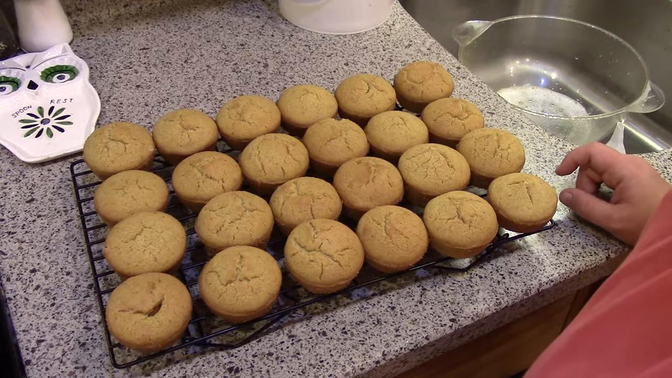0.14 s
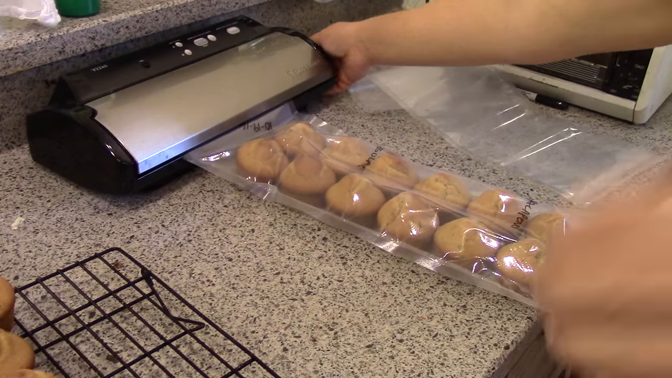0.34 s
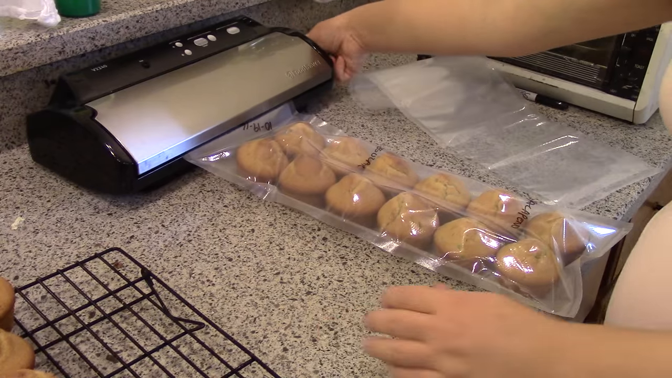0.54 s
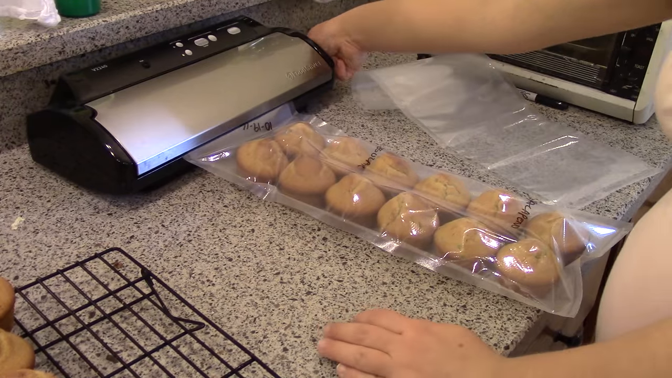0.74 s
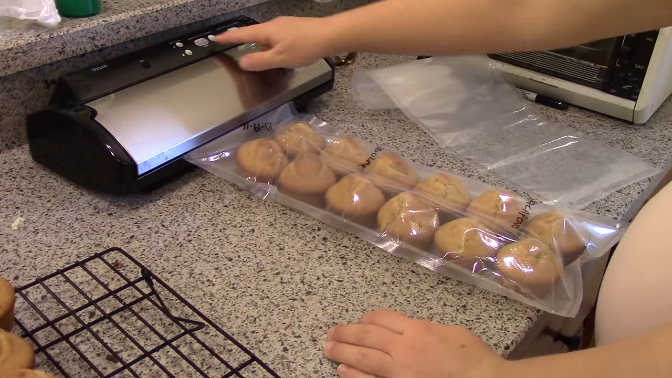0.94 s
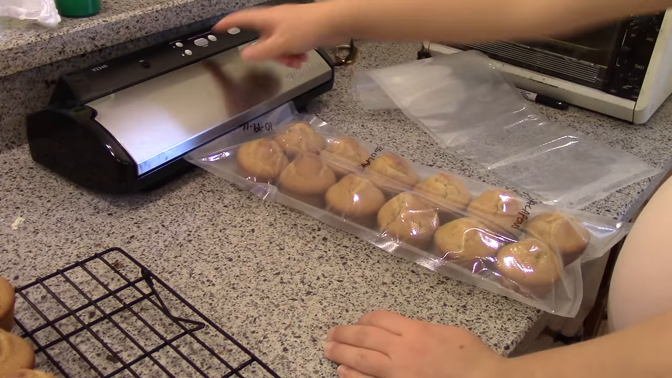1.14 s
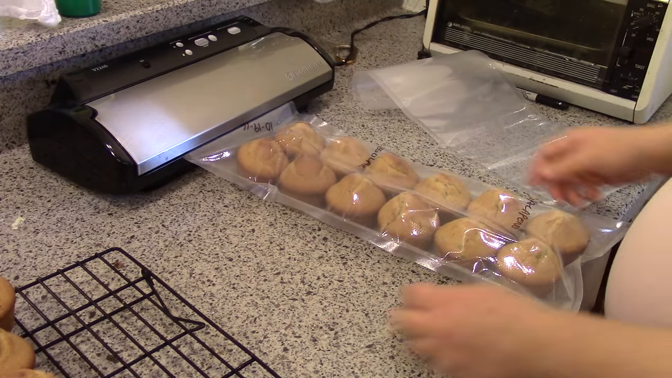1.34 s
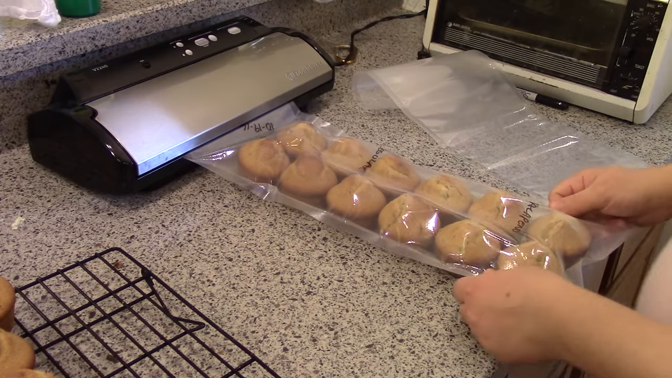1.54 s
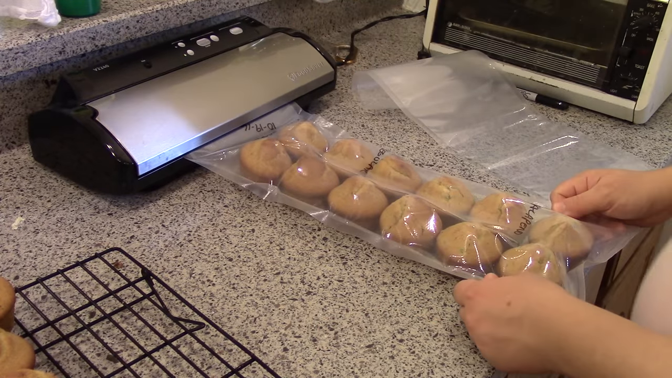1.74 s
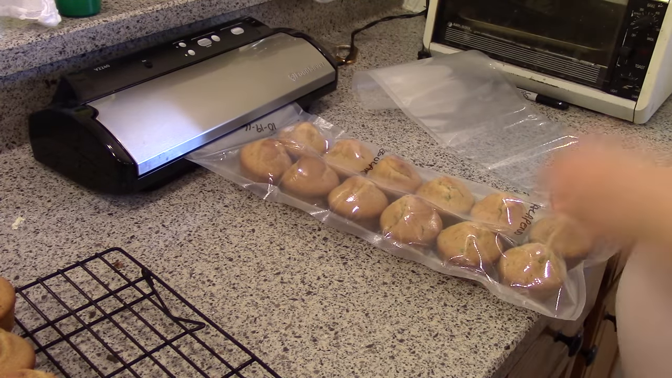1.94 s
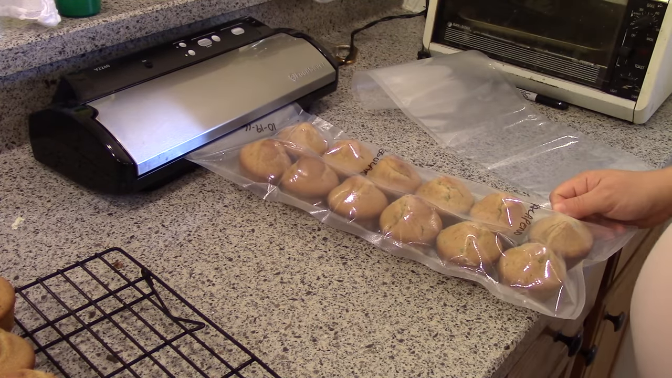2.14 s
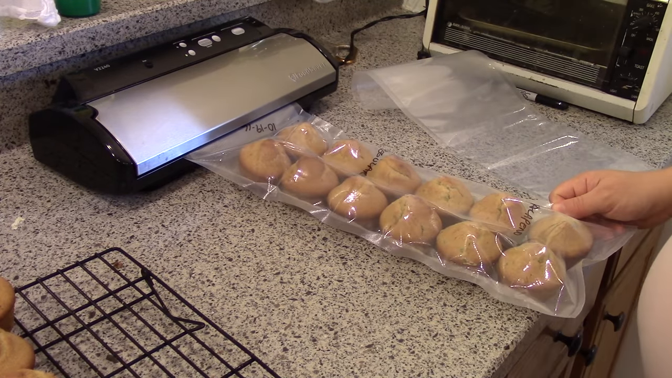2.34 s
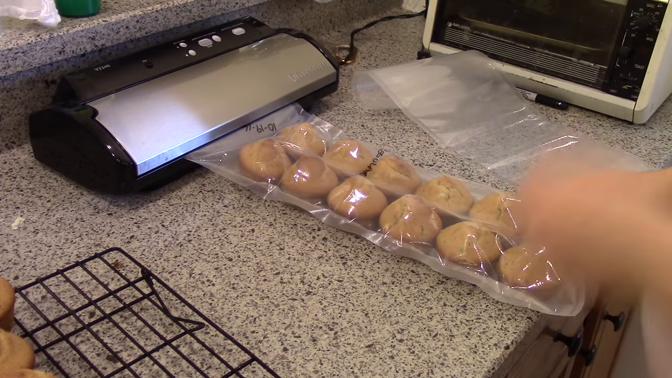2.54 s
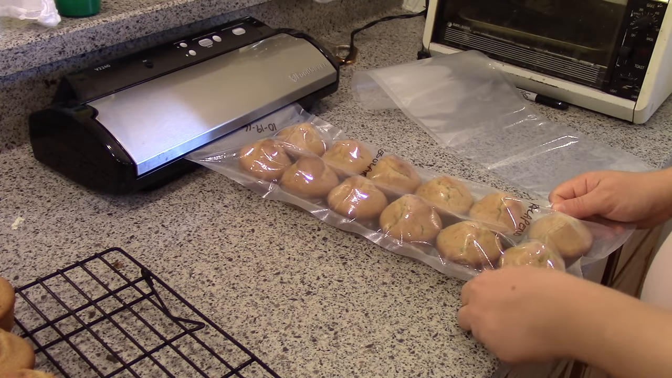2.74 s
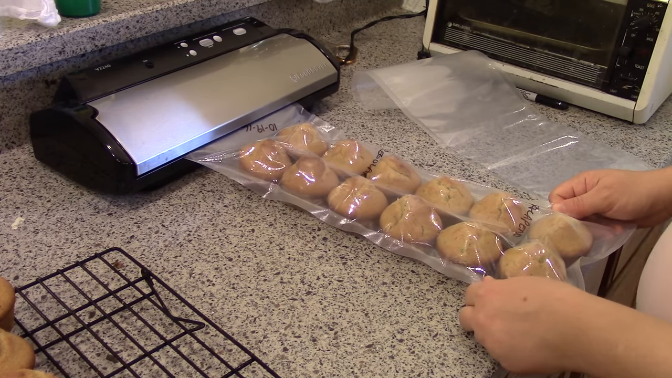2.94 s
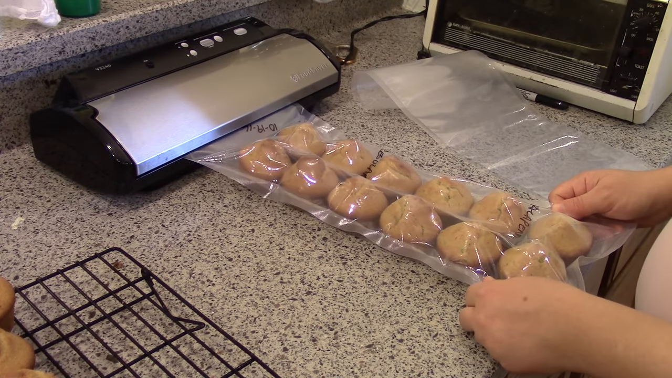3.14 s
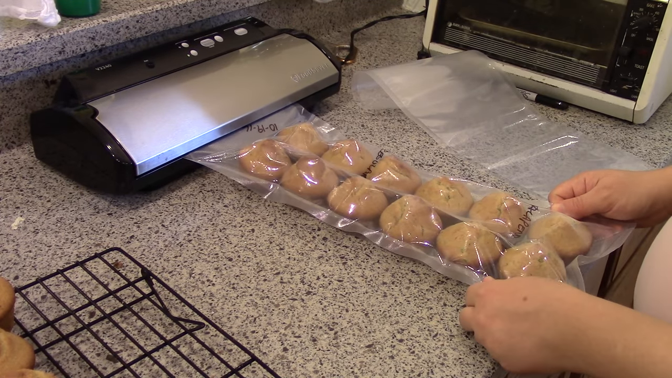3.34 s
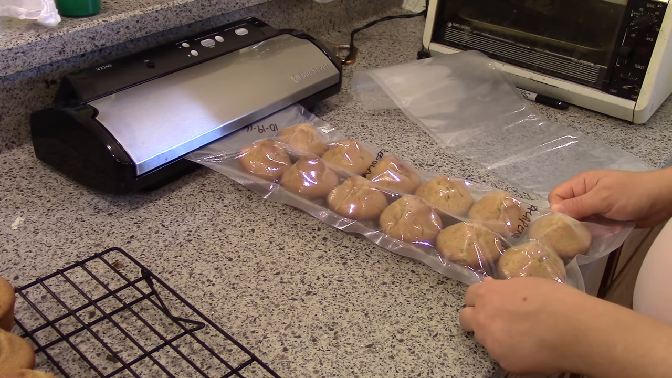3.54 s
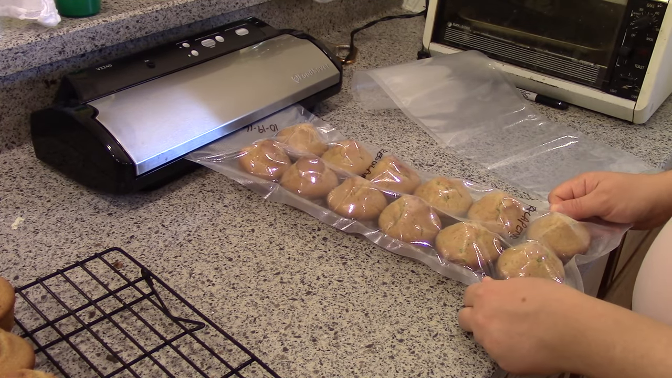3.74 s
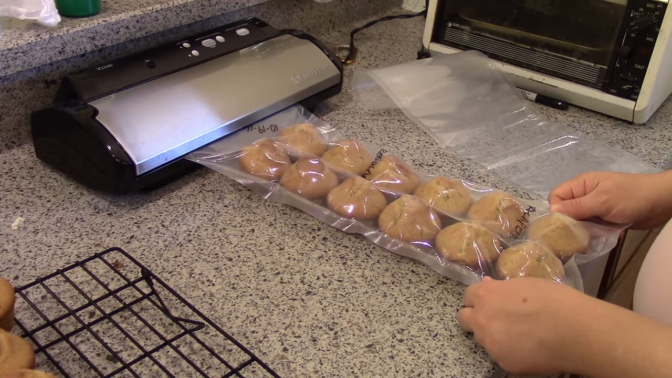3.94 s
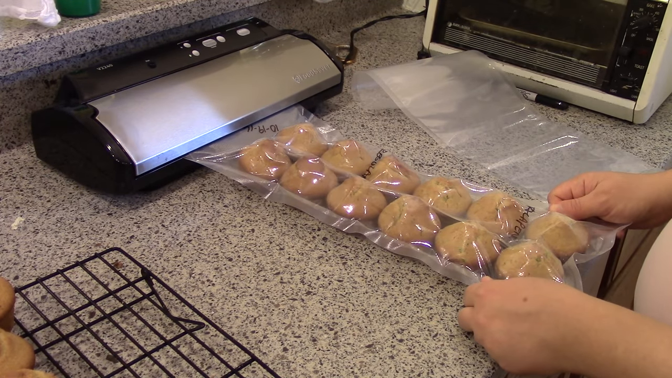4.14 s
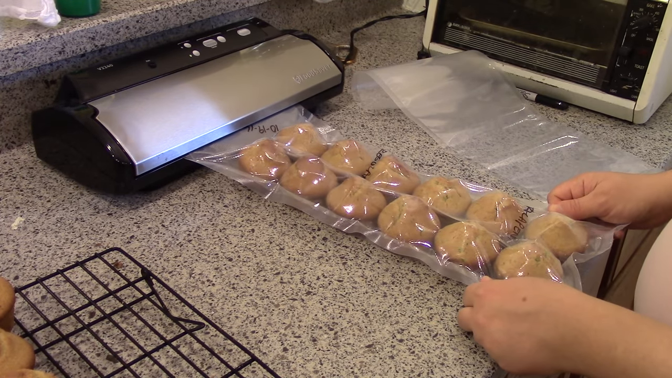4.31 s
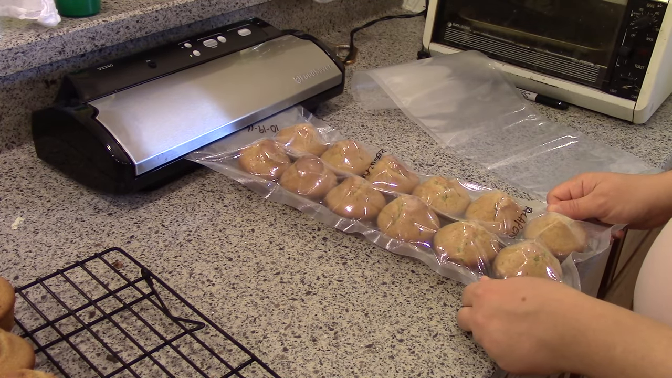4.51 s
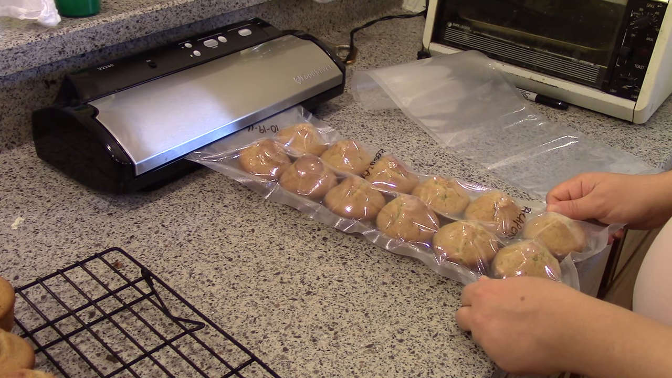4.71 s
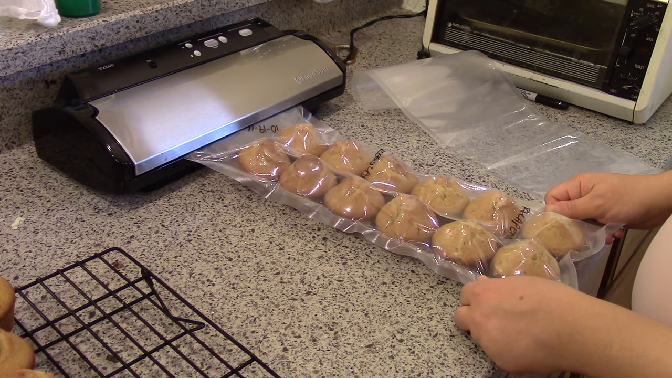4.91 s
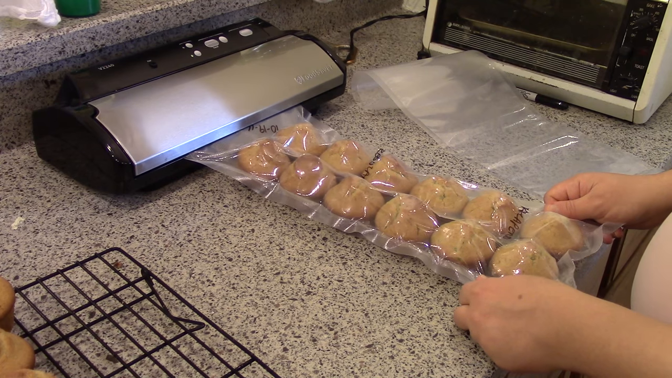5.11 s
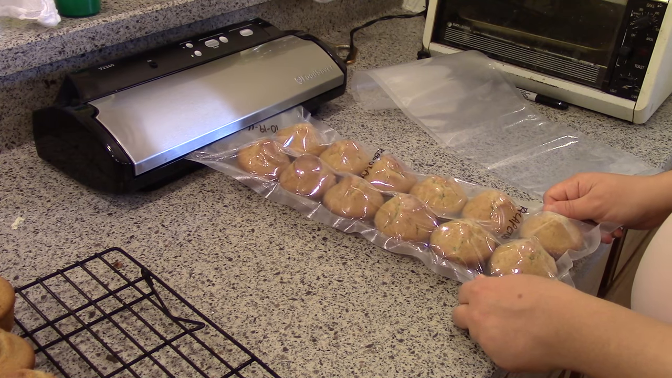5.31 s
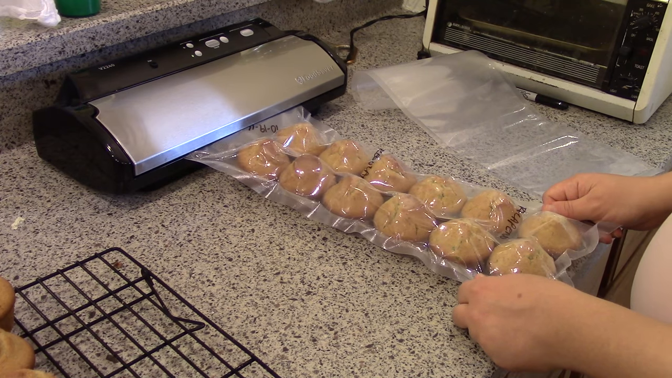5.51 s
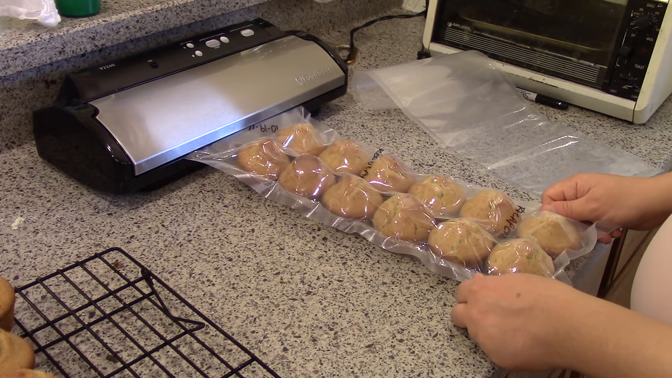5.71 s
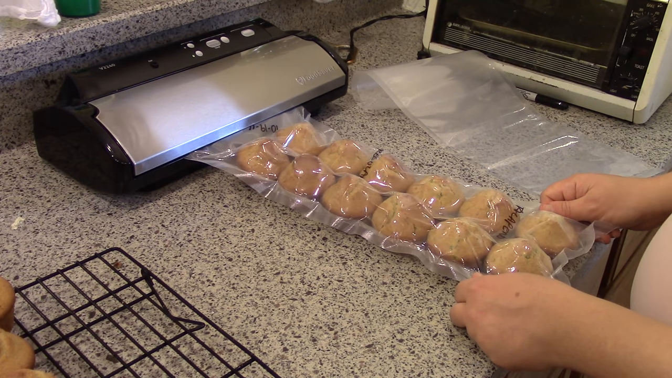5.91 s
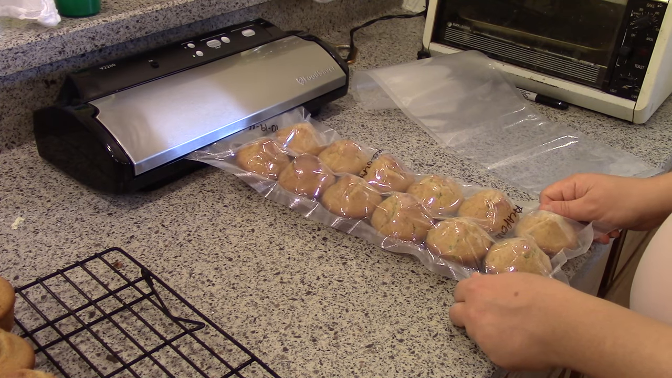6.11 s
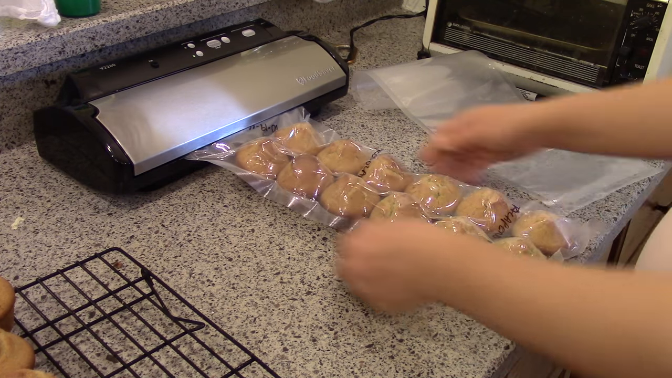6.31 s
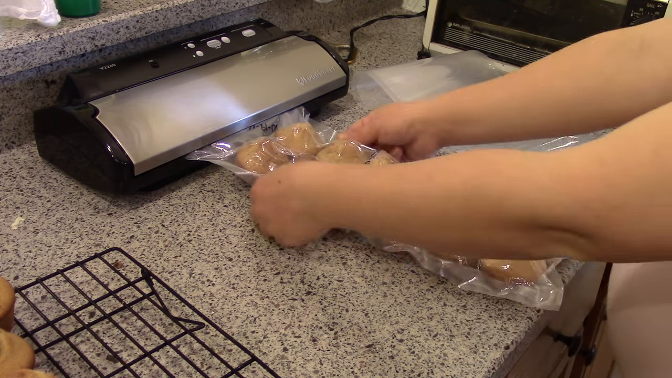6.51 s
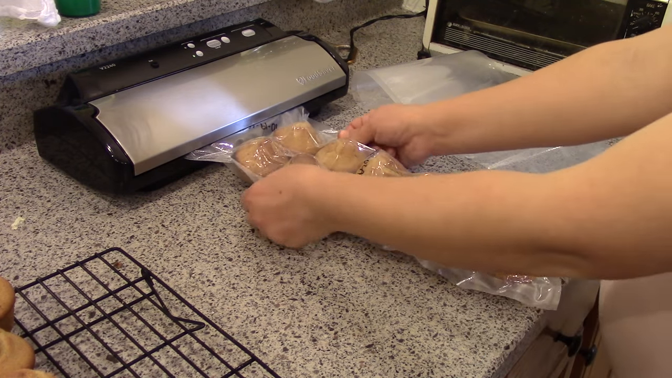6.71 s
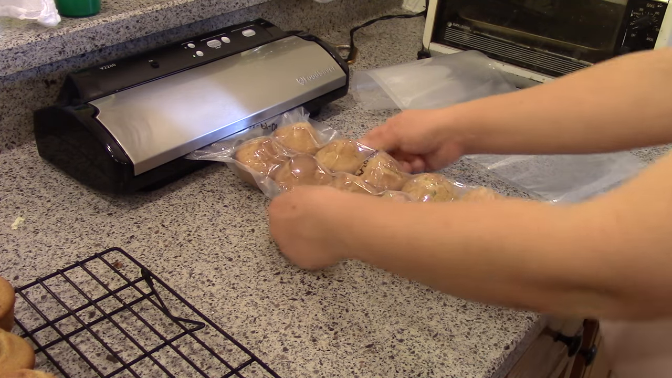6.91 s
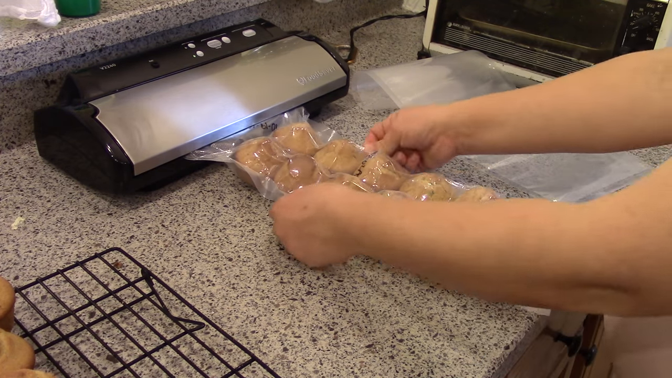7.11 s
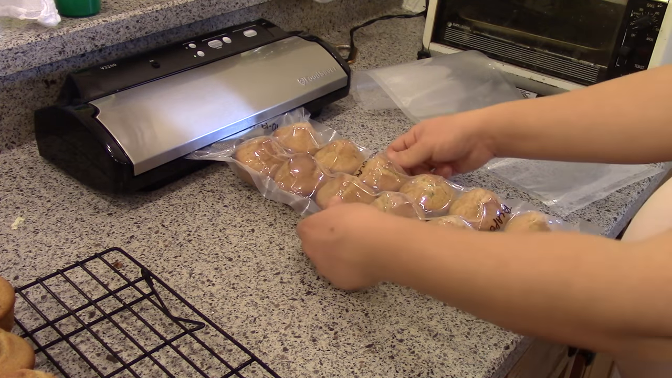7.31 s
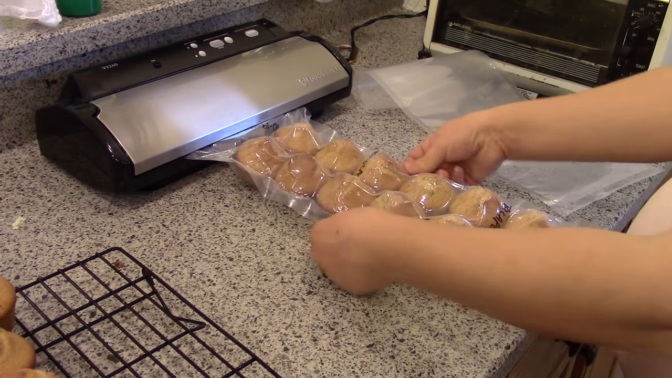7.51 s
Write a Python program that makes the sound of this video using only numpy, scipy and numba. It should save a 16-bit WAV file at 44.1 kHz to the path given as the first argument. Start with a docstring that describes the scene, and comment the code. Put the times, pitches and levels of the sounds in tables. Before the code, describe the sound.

After faint bag rustling and a hard latch snap, a small vacuum pump knocks rapidly and roughly, shifting tone as the plastic bag tightens.

```python
"""A countertop vacuum pump knocks unevenly in its ringing plastic housing, close by in a kitchen.
Each knock sets resonances ringing that shift as the bag tightens; valves tick, chirp and puff air.
Before it a bag is slid in, the lid latches with a snap (struck resonances and noise), a button clicks.
Hands make the film crinkle with short noise bursts. Behind lies quiet room noise; at the very start
a louder room hum is heard, which stops abruptly. All lies straight ahead of a pair of microphones."""
import sys
import numpy as np
from scipy import signal
from scipy.fft import rfft, irfft, next_fast_len
from scipy.io import wavfile
from scipy.ndimage import uniform_filter1d
from numba import njit

SR = 44100
rng = np.random.default_rng(int(sys.argv[2]) if len(sys.argv) > 2 else 0)


def output_pcm(signal):
    """Save a mono or channel-first signal as 16-bit PCM at the path in sys.argv[1].

    Samples are clipped to [-1, 1] before scaling.
    """
    pcm = np.clip(np.atleast_2d(signal).T, -1, 1) * 32767
    wavfile.write(sys.argv[1], SR, np.round(pcm).astype(np.int16))


N = 337761
TIME = np.arange(N) / SR


def from_db(db):
    """Decibels to gain."""
    return 10 ** (np.asarray(db) / 20)


def rms_one(x):
    """Scale to rms 1."""
    return x / np.sqrt(np.mean(x ** 2) + 1e-20)


def in_time(rows):
    """Each column of a curve, joined by straight lines, at every sample."""
    seconds, *columns = np.transpose(rows)
    return [np.interp(TIME, seconds, column) for column in columns]


def fade_in(start_s, length_s):
    """A ramp from 0 to 1."""
    return np.clip((TIME - start_s) / length_s, 0, 1)


def noise(spectrum):
    """Noise of a given colour (rows of Hz, relative dB per Hz), rms 1."""
    hz, db = np.transpose(spectrum)
    size = next_fast_len(N)
    log_hz = np.log(np.arange(size // 2 + 1) * SR / size + 1)
    gain = from_db(np.interp(log_hz, np.log(hz), db, left=-120, right=-120))
    white = rfft(rng.standard_normal(size))
    return rms_one(irfft(white * gain, size)[:N])


def clicks(times, sizes):
    """Single-sample blows."""
    out = np.zeros(N)
    places = np.clip((np.asarray(times) * SR).astype(int), 0, N - 1)
    np.add.at(out, places, sizes)
    return out


def dying(blows, t60):
    """An envelope that jumps at each blow and falls 60 dB in t60 seconds."""
    return signal.lfilter([1], [1, -from_db(-60 / (t60 * SR))], blows + 1e-18)


def ring(blows, hz, t60):
    """A unit blow sets a dying sine of height 1 ringing."""
    r, w = from_db(-60 / (t60 * SR)), 2 * np.pi * hz / SR
    return signal.lfilter([0, np.sin(w)], [1, -2 * r * np.cos(w), r * r], blows + 1e-18)


def band(x, low_hz, high_hz):
    """A gentle band-pass."""
    edges = [low_hz, min(high_hz, .48 * SR)]
    return signal.sosfilt(signal.butter(2, edges, "band", fs=SR, output="sos"), x)


@njit
def gliding_resonance(x, turn, r):
    """A resonance whose centre (radians per sample) moves; gain 1 on top."""
    out, last, before = np.zeros(len(x)), 0., 0.
    for i in range(len(x)):
        now = x[i] + 2 * r * np.cos(turn[i]) * last - r * r * before
        out[i] = (now - before) * (1 - r * r) / 2
        before, last = last, now
    return out


def resonance(x, hz, width_hz):
    """A resonance at a fixed or moving pitch."""
    turn = np.ones(N) * 2 * np.pi * hz / SR
    return gliding_resonance(x, turn, np.exp(-np.pi * width_hz / SR))


def smeared(x, hz, width_hz):
    """An all-pass: waves near one pitch cross the casing late, which rounds each knock."""
    r = np.exp(-np.pi * width_hz / SR)
    poles = [1, -2 * r * np.cos(2 * np.pi * hz / SR), r * r]
    return signal.lfilter(poles[::-1], poles, x)


def kitchen(x, t60, treble_t60, echo_db):
    """The direct sound plus a dense noise tail from hard walls, with its own decay for the treble."""
    t = TIME[:SR // 2]
    low = band(rng.standard_normal(len(t)), 100, 5500)
    high = band(rng.standard_normal(len(t)), 6000, 12000)
    tail = low * from_db(-60 * t / t60) + high * from_db(-60 * t / treble_t60)
    tail = tail * np.clip(t / 0.01 - 1, 0, 1)  # silent for 10 ms, then swells for 10 ms
    return x + from_db(echo_db) * signal.fftconvolve(x, tail / np.sqrt(np.sum(tail ** 2)))[:N]


# Room air all around. Each row: frequency in Hz, relative level in dB per Hz.
ROOM_SPECTRUM = [(15, -52), (25, -38), (87, -10.5), (133, -11), (184, -1.5), (284, -3.5), (392, -8),
                 (792, -15.5), (1120, -19.5), (2210, -28.5), (5000, -38.5), (15800, -52)]
# The louder hum of the first moment. Each row: frequency in Hz, relative level in dB per Hz.
HUM_SPECTRUM = [(15, -53), (25, -28), (53, -34), (137, -47), (161, -10), (217, -20), (248, -2.5),
                (334, -8.5), (425, -5), (514, -16.5), (1010, -17.5), (2210, -31), (4450, -37.5),
                (15800, -52)]
ROOM_DB, HUM_DB, HUM_END_S = -56, -44.5, .235


def background():
    """Quiet room air, and the louder hum of the first moment: two coloured noises."""
    hum = from_db(HUM_DB) * noise(HUM_SPECTRUM) * (1 - fade_in(HUM_END_S, length_s=0.0032))
    return from_db(ROOM_DB) * noise(ROOM_SPECTRUM) + hum


# Film against the slot. Each row: frequency in Hz, relative level in dB per Hz.
RUSTLE_SPECTRUM = [(530, -35.5), (900, 1.5), (1600, -6), (2100, -2.5), (3250, -7), (5990, -22.5),
                   (15000, -34)]
# Hand against the lid. Each row: frequency in Hz, relative level in dB per Hz.
RUBBING_SPECTRUM = [(59, -39.5), (100, -29.5), (135, -15), (267, -1), (354, 0), (412, -4), (609, 2.5),
                    (1100, -18), (1430, -56.5), (2420, -120)]
# Pushes that work the bag into the slot. Each row: middle in seconds, length in seconds,
# rustle peak in dB, rubbing peak in dB.
PUSHES_INTO_SLOT = [(0.337, 0.14, -46, -51), (.372, .03, -45.5, -51), (0.444, 0.063, -45.5, -47.5),
                    (0.528, 0.061, -54, -46), (0.593, 0.045, -46.5, -47.5)]
RUSTLE_EDGE_DB, RUB_EDGE_DB = 15, 5  # how far a push's two ends lie below its peak


def sliding():
    """Each push swells and fades: the film rustles into the slot while a hand rubs and presses the lid."""
    rustle, rub = 0, 0
    for middle_s, length_s, rustle_db, rub_db in PUSHES_INTO_SLOT:
        away = np.minimum(2 * np.abs(TIME - middle_s) / length_s, 20)  # 0 in the middle, 1 at the ends
        rustle = np.maximum(rustle, from_db(rustle_db - RUSTLE_EDGE_DB * away))
        rub = np.maximum(rub, from_db(rub_db - RUB_EDGE_DB * away))
    contact = rustle * noise(RUSTLE_SPECTRUM) + rub * noise(RUBBING_SPECTRUM)
    return contact * fade_in(0.278, length_s=0.011)


# A finger bumps the lid. Each row: time in seconds, level in dB.
LID_BUMPS = [(.409, -36), (.436, -39), (.579, -43), (.596, -41)]
# What a bump rings with. Each row: pitch in Hz, level in dB relative to the bump, t60 in seconds.
BUMP_MODES = [(200, -4.5, .05), (343, -6, .04), (656, 0, 0.027), (1310, -12, .02)]
# The lid's seal creaks as it is pressed. One row: middle in seconds, length in seconds,
# pitch in Hz, level in dB.
SEAL_CREAK = (0.7, 0.41, 626, -51)


def pressing():
    """The hand bumps the lid into ringing a few times, and the seal gives one short, narrow-band creak."""
    times, db = np.transpose(LID_BUMPS)
    bumps = sum(ring(clicks(times, from_db(db + level)), hz, t60) for hz, level, t60 in BUMP_MODES)
    middle_s, length_s, creak_hz, creak_db = SEAL_CREAK
    swell = np.exp(-(2 * (TIME - middle_s) / length_s) ** 4)
    creak = rms_one(resonance(rng.standard_normal(N), creak_hz, width_hz=110))
    return band(bumps, low_hz=150, high_hz=3000) + from_db(creak_db) * swell * creak


# The brighter a snap, the less body: share in dB at no treble share, dB lost per dB of treble share.
BODY_SHARE_DB, BODY_TRADE = -16, 0.48


def snaps(rows, t60, mid_db, high_db):
    """Short plastic snaps: dying noise in three bands, some dull, some bright, with a little kitchen."""
    times, db, treble_share_db = np.transpose(rows)
    body_share_db = BODY_SHARE_DB - BODY_TRADE * treble_share_db
    bands = [(body_share_db, 1600, 2600), (mid_db, 2600, 5500), (treble_share_db + high_db, 6000, 12000)]
    out = 0
    for level_db, low_hz, high_hz in bands:
        burst = dying(clicks(times, from_db(db + level_db)), t60) * rng.standard_normal(N)
        out = out + band(burst, low_hz, high_hz) * np.sqrt(SR / 2 / (high_hz - low_hz))  # even power
    return kitchen(out, t60=0.11, treble_t60=0.1, echo_db=-15.5)


# The hands take a new grip. Each row: start in seconds, length in seconds, crinkle level in dB.
NEW_GRIPS = [(2.578, 0.13, -39.5), (6.621, 0.2, -46), (7.34, .23, -59)]
GRIP_LONGEST_GAP_S, GRIP_SPREAD_DB, GRIP_TREBLE_DB = 1.7 / 70, 3, -17


def small_crinkles(count=40):
    """Creases flip at random while a hand grips the film: rows of (s, level dB, treble share dB)."""
    rows = []
    for start_s, length_s, db in NEW_GRIPS:
        gaps = rng.uniform(0, GRIP_LONGEST_GAP_S, count)
        sizes = rng.standard_normal(count)
        for after_s, size in zip(np.cumsum(gaps) - gaps[0], sizes):
            if after_s < length_s:
                rows.append((start_s + after_s, db + GRIP_SPREAD_DB * size, GRIP_TREBLE_DB))
    return rows


# The bag's loudest snaps. Each row: time in seconds, level in dB, treble share in dB.
LOUD_CRINKLES = [(0.0301, -40, -50), (0.339, -34, -28), (0.4324, -37, -17), (0.5936, -50, -4.5),
                 (1.1216, -30, -12.5), (1.4626, -18.5, -17.5), (1.6911, -43, -18), (1.8625, -29.5, -16),
                 (2.5995, -36, -31), (2.6943, -37, -11), (3.9475, -27.5, -19), (6.1641, -31, -19),
                 (6.6333, -37, -24), (6.6583, -39, -13), (6.7573, -24.5, -16.5), (6.8264, -39.5, -32),
                 (7.208, -23, -22), (7.31, -29.5, -16), (7.3806, -38, -17), (7.4774, -48, -10),
                 (7.5093, -38, -13)]


def crinkles():
    """Creases in the film flip over: a few loud ones, and small ones under the hands."""
    return snaps(list(LOUD_CRINKLES) + small_crinkles(), t60=0.033, mid_db=-11.5, high_db=1)


# The start button. Each row: time in seconds, level in dB, treble share in dB.
BUTTON_CLICK = [(1.0255, -47.5, -20)]


def button():
    """The start button gives one faint plastic click."""
    return snaps(BUTTON_CLICK, t60=0.049, mid_db=-13.0, high_db=-2)


# The lid's catches. Each row: time in seconds, relative force in dB.
CATCHES = [(0.6396, 2.5), (0.641, -1.5), (0.645, -26.5), (.648, -23)]
# The lid's ring. Each row: pitch in Hz, relative level in dB, t60 in seconds.
LID_MODES = [(360, 0.5, 0.091), (582, -11, 0.077), (1980, -20.5, .04), (2820, -8.5, 0.03),
             (3360, 1.5, 0.029), (4300, -13, 0.02), (4800, -18, .035)]
# Colour of the snap. Each row: frequency in Hz, relative level in dB per Hz.
SNAP_SPECTRUM = [(470, 7), (800, -5), (1120, -8), (1780, -8.5), (1920, -0.5), (2090, -8), (4270, -2.5),
                 (9140, -14), (10100, -12), (15800, -34.5)]


def latch(crack_db, crack_t60, body_db, tail_db, tail_t60, treble_t60, top):
    """The catches snap home in quick succession and ring the lid; a smooth tail follows, peaks are rounded."""
    times, db = np.transpose(CATCHES)
    blows = clicks(times, from_db(db))
    crack = from_db(crack_db) * dying(blows, crack_t60) * noise(SNAP_SPECTRUM)
    body = from_db(body_db) * sum(from_db(level) * ring(blows, hz, t60) for hz, level, t60 in LID_MODES)
    tail = dying(blows, tail_t60) * band(noise(SNAP_SPECTRUM), low_hz=300, high_hz=5500)
    tail = tail + dying(blows, treble_t60) * band(noise(SNAP_SPECTRUM), low_hz=4500, high_hz=13000)
    snap = band(crack + from_db(tail_db) * tail, low_hz=262, high_hz=18000)
    snap = snap + band(body, low_hz=250, high_hz=9040)
    return band(top * np.tanh(snap / top), low_hz=150, high_hz=20000)


# Vacuum in the bag. Each row: time in seconds, vacuum (0 slack bag, 1 drawing in, 2 tight).
BAG_VACUUM = [(1.1, 0), (2.4, .1), (3.4, .45), (4.3, 1), (5.3, 1.04), (5.8, 1.5), (6.3, 2)]
# From here the resonances glide on to their last pitches: start, length.
LAST_GLIDE_S, GLIDE_LENGTH_S = 6.65, .8


def stages():
    """Progress of the bag: 0 slack, 1 drawing in, 2 tight, 3 empty."""
    return in_time(BAG_VACUUM)[0] + fade_in(LAST_GLIDE_S, GLIDE_LENGTH_S)


def at_stage(values, stage):
    """Blend the values of neighbouring stages."""
    return np.interp(stage, np.arange(len(values)), values)


PUMP_START_S, SPIN_UP_S = 1.076, .06


def steady(x):
    """The running pump's sound with its slow level (over a quarter second) at about 1."""
    running_share = uniform_filter1d(1. * (TIME > PUMP_START_S), SR // 4)
    power = uniform_filter1d(x ** 2, SR // 4) / np.maximum(running_share, .1)
    return x / np.sqrt(np.maximum(power, 0) + np.mean(x ** 2) / 1000)


# Nominal time between knocks. Each row: time in seconds, quick gap in seconds, slow gap in seconds.
KNOCK_GAPS = [(1.1, .0094, .013), (3.5, .0085, .0126), (4.8, .0074, .0134), (5.6, .0076, .0135),
              (6.05, .0064, .0133), (6.3, .0092, .012), (6.7, .0098, .013), (7.05, .009, .0145),
              (7.4, .0085, .015)]
QUICK_FROM, QUICK_TO = .22, .72  # part of the cycle (0-1) with quick gaps
# The pump slows under load. Each row: time in seconds, cycles per second.
PUMP_SPEED = [(1.1, 23.15), (2.2, 23.05), (2.7, 22.78), (3.8, 22.83), (4.9, 22.6), (5.4, 22.15),
              (5.8, 22.1), (6.2, 21.55), (6.6, 21.45), (7.1, 20.7)]
START_PLACE = .85  # place in the cycle (0-1) at the start
# Force of a knock. Each row: place in the cycle (0-1), force in dB before the stage's share below.
STROKE_FORCE = [(0, -1), (.25, 0), (.42, -2), (.55, -4.5), (.75, -8), (.9, -7), (1, -1)]
# The lighter contacts fall back: share of the force's dB at each stage, slack, drawing, tight, empty.
FORCE_SHARE = (.72, 1, .45, .8)
# Pitch of each housing resonance. Each row: Hz with a slack bag, drawing in, tight, empty,
# then its pull on the knocks' timing (0-1).
HOUSING_PITCHES = [(320, 348, 352, 364, 0), (448, 445, 410, 410, .5), (540, 535, 570, 590, 0),
                   (630, 610, 640, 665, 0), (672, 672, 752, 790, .45), (768, 812, 800, 840, .3),
                   (861, 853, 838, 915, 1), (945, 940, 905, 880, .3), (1050, 1050, 975, 1030, 0),
                   (1130, 1170, 1105, 1120, 0), (1222, 1212, 1200, 1185, .3), (1275, 1285, 1280, 1280, 0),
                   (1445, 1400, 1440, 1490, .6)]


def strokes(jitter_s, play_s, stray, swing_t60, spread_db, miss_s, count=800):
    """A loose part rattles about four times a cycle; it lands where the casing swings to meet it."""
    stage = stages()
    quick_s, slow_s = in_time(KNOCK_GAPS)
    cycles = START_PLACE + np.cumsum(in_time(PUMP_SPEED)[0] * (TIME > PUMP_START_S)) / SR
    housing_rows = np.array(HOUSING_PITCHES)
    pitches, pull = housing_rows[:, :-1], housing_rows[:, -1]
    blows, swing, i = np.zeros(N), 0, int(PUMP_START_S * SR)
    for late, slip, force, miss in rng.standard_normal((count, 4)):
        if i >= N - SR // 500:
            break
        place = cycles[i] % 1
        force_db = np.interp(place, *np.transpose(STROKE_FORCE)) * at_stage(FORCE_SHARE, stage[i])
        blows[i + int(miss_s * miss * SR)] = from_db(force_db + spread_db * force)
        is_quick = QUICK_FROM < place + stray * slip < QUICK_TO
        nominal_s = quick_s[i] if is_quick else slow_s[i]
        gaps = nominal_s + jitter_s * late + np.arange(-play_s, play_s, 2 / SR)
        hz = np.array([at_stage(row, stage[i]) for row in pitches])
        # each resonance as a turning, dying phasor after every possible gap
        swings = (swing + 1) * np.exp(np.outer(gaps, 2j * np.pi * hz - np.log(1000) / swing_t60))
        best = np.argmax(swings.real @ pull)
        swing, i = swings[best], i + int(gaps[best] * SR)
    return blows


# Ring of the same resonances. Each row: width in Hz, then lift in dB with a slack bag, drawing in,
# tight, empty.
HOUSING_LIFTS = [(41.5, 4.5, 10, 14, 16.5), (29.2, 5.5, 5, -9, 9.5), (34.0, 0.5, 0.0, 10, -5),
                 (54.0, 7, 1.5, 2.5, 15.5), (43, 7, 13.5, 9.0, -4), (40, 7.5, 6.5, 2.5, 8.5),
                 (34, 12, 5, 7, 11), (38, 2, 11, -5.5, 0.5), (47.0, 10, 2.5, 6.5, 5.0),
                 (42.0, 0, 2, 10, -9), (42.0, 14.5, 8, 6.5, 16), (31.0, 0.5, 7.5, 1.0, 3),
                 (35, 11, 4.5, 5, 12.5)]
# The bare knock: centre in Hz at each stage, and its width in Hz on each of two passes.
THUD_HZ, THUD_WIDTH_HZ = (460, 660, 722, 722), 667


def housing(blows, low_hz, high_hz):
    """Each knock is a dull thud lifted by the casing's resonances, which shift as the bag empties."""
    stage = stages()
    out = smeared(blows + 1e-18, hz=814, width_hz=300)
    out = smeared(out, hz=1235, width_hz=89)
    for _ in range(2):
        out = resonance(out, at_stage(THUD_HZ, stage), THUD_WIDTH_HZ)
    for (*pitches, _), (width_hz, *lifts_db) in zip(HOUSING_PITCHES, HOUSING_LIFTS):
        lift = from_db(at_stage(lifts_db, stage)) - 1
        out = out + lift * resonance(out, at_stage(pitches, stage), width_hz)
    out = signal.sosfilt(signal.butter(6, high_hz, fs=SR, output="sos"), out)
    return signal.sosfilt(signal.butter(2, low_hz, "high", fs=SR, output="sos"), out)


# The straining motor's drone: level in dB at each stage, slack, drawing, tight, empty.
DRONE_LEVELS = (-77, -44.5, -40.5, -41.5)


def drone():
    """A rough note: noise through the lowest housing resonance, swelling as the bag tightens."""
    stage = stages()
    hz = at_stage(HOUSING_PITCHES[0][:-1], stage)
    note = resonance(rng.standard_normal(N), hz, width_hz=42)
    note = resonance(note, hz, width_hz=42)
    return from_db(at_stage(DRONE_LEVELS, stage)) * rms_one(note)


# Escaping air. Each row: frequency in Hz, relative level in dB per Hz.
AIR_SPECTRUM = [(1200, -56), (1700, 2), (2300, -4), (2800, -8), (3600, -10.5), (4500, -20), (5900, -17),
                (7400, -22), (8800, -18.5), (11000, -22.5), (14000, -24), (15800, -42)]
# Ringing of the valves. Each row: pitch in Hz, relative level in dB, t60 in seconds.
VALVE_MODES = [(2766, 12.5, 0.062), (5920, 1.5, 0.087), (8470, 4.5, 0.013), (9000, 15, 0.0068),
               (9830, 12, 0.0086), (11640, 4, 0.041)]
# The valve's chirp: level in dB at each stage, slack, drawing, tight, empty.
CHIRP_LEVELS = (-49.5, -54.5, -52.5, -56.5)
# Motor shaking the counter. Each row: frequency in Hz, relative level in dB per Hz.
RUMBLE_SPECTRUM = [(15, -40), (25, -17), (50, -12), (100, -9.5), (150, 2.5), (250, 0.5), (330, -4),
                   (600, -9)]
VALVE_LEAD_S, VALVE_SHARE = .0023, .25  # the valve opens ahead of the knock, with a share of its force
CHURN_DB = -39  # the motor's steady churning fed to the housing, against the knocks
KNOCK_DB, KNOCK_LOSS_DB = -26.5, 0.6053  # with a slack bag; lost per vacuum cubed in thinner air
AIR_DB, AIR_LOSS_DB = -45, 2.5  # with a slack bag; lost per unit of vacuum
RUMBLE_LOSS_DB = 1.4  # per unit of vacuum


def pump(puff_t60, leak, valve_db, chirp_hz, chirp_width_hz, rumble_db):
    """Ahead of each knock a valve opens with a tick, chirp and puff of air; the motor churns and rumbles."""
    vacuum, stage = in_time(BAG_VACUUM)[0], stages()
    blows = strokes(jitter_s=.0004, play_s=.001, stray=.07, swing_t60=.13, spread_db=.4, miss_s=.00012)
    opening = np.roll(blows, -int(VALVE_LEAD_S * SR))
    churn = from_db(CHURN_DB) * rng.standard_normal(N)
    body = housing(blows + VALVE_SHARE * opening + churn, low_hz=238, high_hz=1620)
    knocks = steady(kitchen(body, t60=.25, treble_t60=.2, echo_db=-15))
    air = steady((dying(opening ** 2, puff_t60) + leak) * noise(AIR_SPECTRUM))
    valves = steady(sum(from_db(db) * ring(opening ** 2, hz, t60) for hz, db, t60 in VALVE_MODES))
    chirps = resonance(opening ** 4 + 1e-18, chirp_hz, chirp_width_hz)
    chirps = steady(resonance(chirps, chirp_hz, chirp_width_hz))
    running = from_db(KNOCK_DB - KNOCK_LOSS_DB * vacuum ** 3) * knocks
    running = running + from_db(AIR_DB - AIR_LOSS_DB * vacuum) * (air + from_db(valve_db) * valves)
    running = running + from_db(at_stage(CHIRP_LEVELS, stage)) * chirps + drone()
    running = running + from_db(rumble_db - RUMBLE_LOSS_DB * vacuum) * noise(RUMBLE_SPECTRUM)
    return running * fade_in(PUMP_START_S, SPIN_UP_S)


def scene():
    """All lies straight ahead; a faint echo tail and very faint steady noise differ between the channels."""
    mid = background() + sliding() + pressing() + crinkles() + button()
    mid = mid + latch(crack_db=-18.5, crack_t60=0.021, body_db=-23.5, tail_db=-41.0, tail_t60=0.28,
                      treble_t60=0.16, top=0.43)
    mid = mid + pump(puff_t60=0.057, leak=0.36, valve_db=-9, chirp_hz=1990, chirp_width_hz=140,
                     rumble_db=-48.5)
    spread = mid + from_db(-25) * band(mid, low_hz=2290, high_hz=16100)
    echo = kitchen(spread, t60=.1, treble_t60=.2, echo_db=-27) - spread  # the tail alone
    side = echo + from_db(-82) * noise([(20, 0), (200, 0), (1000, -15), (15800, -19)])
    return np.array([mid + side, mid - side])


CUTOFF_HZ = 15900


def record(dry):
    """Both microphone channels lose the top treble to a steep low-pass."""
    return signal.sosfilt(signal.ellip(10, .1, 80, CUTOFF_HZ, fs=SR, output="sos"), dry)


dry = scene()
out = record(dry)
output_pcm(out)
```